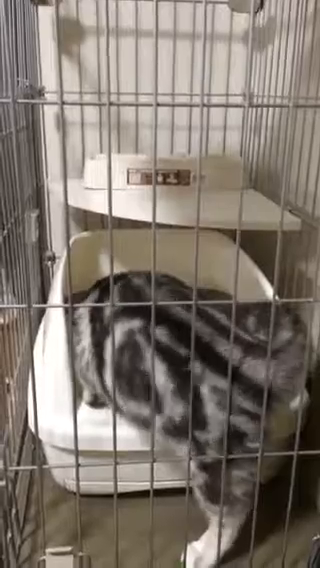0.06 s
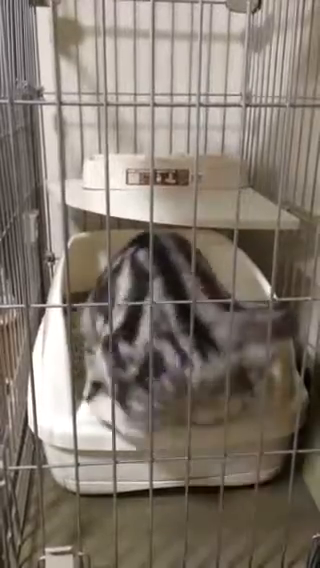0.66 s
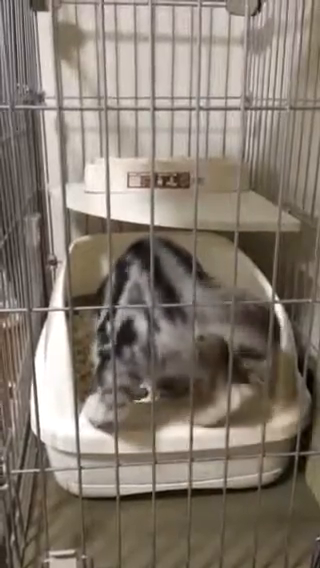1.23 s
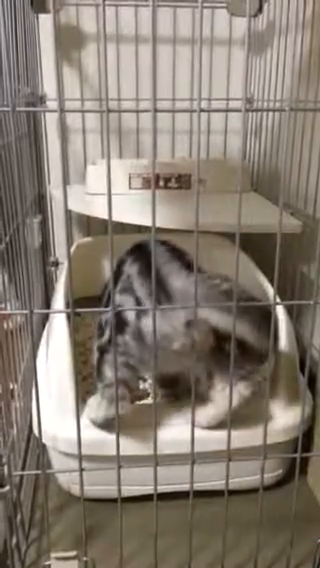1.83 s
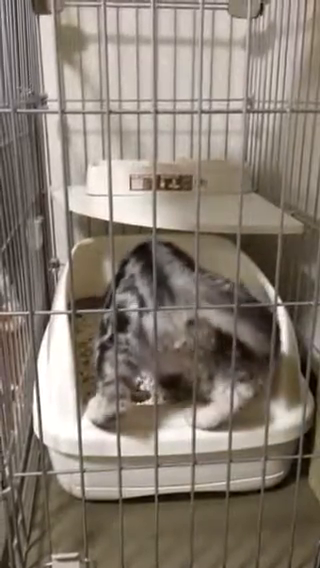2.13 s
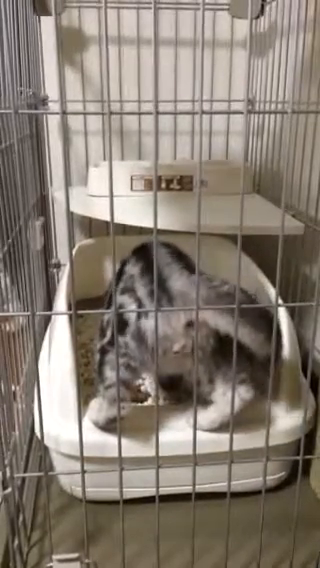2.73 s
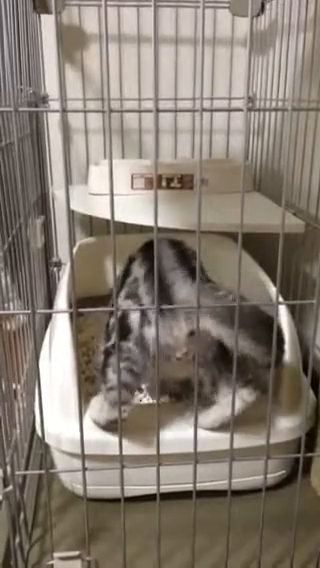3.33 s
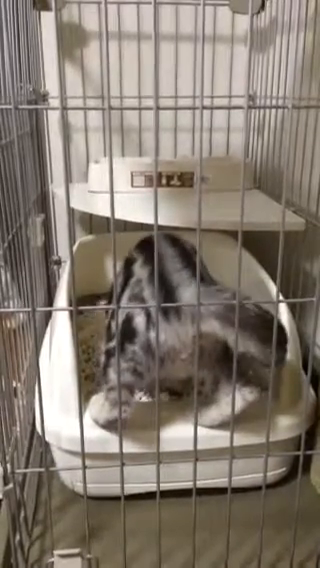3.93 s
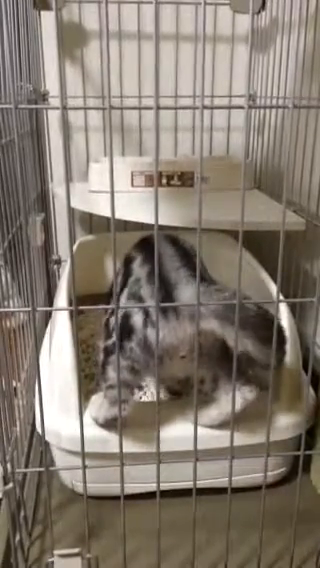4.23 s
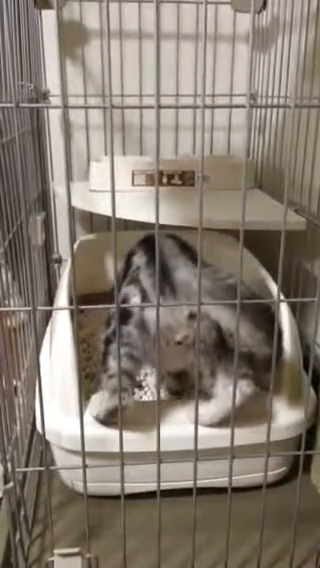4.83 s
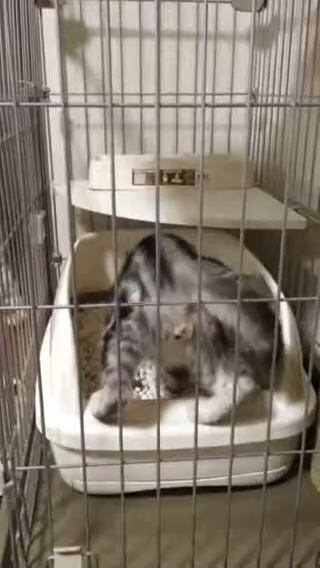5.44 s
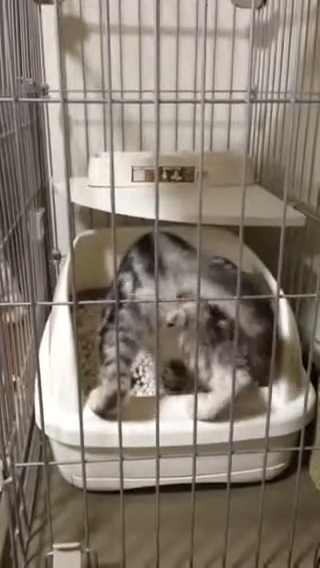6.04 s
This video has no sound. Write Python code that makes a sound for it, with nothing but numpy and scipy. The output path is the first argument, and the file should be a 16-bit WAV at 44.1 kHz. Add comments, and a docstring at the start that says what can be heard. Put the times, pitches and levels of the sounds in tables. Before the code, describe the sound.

In a small, quiet room, a kitten paws through granular litter in two bouts with a short rest between them. Scratchy rustles and gritty crunches mix with sharp little pellet clicks and a few padded knocks on the hollow plastic box. The second bout is somewhat louder. It is heard from nearby with little echo, over a faint low hum and tiny electrical ticks.

```python
"""In a small quiet room, a kitten climbs into a plastic litter box and digs in two bouts.
Its paws thump the hollow tray. Each sweep sets the litter hissing by friction, then settling; each drag
swells and dies as pellets crunch together, and single ones clack on the plastic, exciting its resonances.
Behind it are a low room rumble, mains hum, tiny electrical ticks and a faint whine that fades."""
import sys
import numpy as np
from scipy import signal
from scipy.fft import rfft, irfft, next_fast_len
from scipy.io import wavfile

SR = 44100
rng = np.random.default_rng(int(sys.argv[2]) if len(sys.argv) > 2 else 0)


def bounce(signal):
    """Save signal as a 16-bit WAV file at the path given by the first command-line argument."""
    frames = np.transpose(np.atleast_2d(signal))
    limited = np.clip(frames, -1, 1)
    pcm = np.round(limited * 32767).astype(np.int16)
    wavfile.write(sys.argv[1], SR, pcm)


N = 272538
TIME = np.arange(N) / SR

# spectrum of pellets grinding together: f/Hz, relative level/dB
CRUNCH_SPECTRUM = [(60, -32), (170, -5.5), (350, -5.5), (700, 0), (1200, 2), (2300, -1.5), (3800, -4.5),
                   (5200, -10.5), (8000, -20.5), (15000, -33)]
# spectrum of a pellet striking plastic: f/Hz, relative level/dB
CLACK_SPECTRUM = [(80, -9), (250, -20), (600, -8), (1200, 3.5), (2200, 6), (3800, 7), (5200, 2),
                  (7000, 1.5), (10000, -3), (16000, -15)]


def from_db(db):
    return 10 ** (np.asarray(db) / 20)


def rms_one(x):
    return x / np.sqrt(np.mean(x ** 2) + 1e-20)


def butter(x, hz, kind, order=2):
    return signal.sosfilt(signal.butter(order, hz, kind, fs=SR, output="sos"), x)


def colour(x, spectrum):
    """Spectral shaping: each frequency is weighted by the given curve; rms 1."""
    hz, db = np.transpose(spectrum)
    size = next_fast_len(len(x))
    bins = np.maximum(np.fft.rfftfreq(size, 1 / SR), 1)
    gain = from_db(np.interp(np.log(bins), np.log(hz), db))
    return rms_one(irfft(rfft(x, size) * gain, size)[:len(x)])


def drift(per_s):
    """Random modulation: straight lines join `per_s` chance values a second; rms 1."""
    return rms_one(np.interp(TIME * per_s, np.arange(N), rng.standard_normal(N)))


def grains(per_s, spread_db, decay_s):
    """Shot-noise envelope: random contacts of unequal size add in power, each dying quickly; rms 1."""
    sizes = from_db(spread_db * np.minimum(rng.exponential(1, N), 4))
    contacts = sizes * (rng.random(N) < per_s / SR)
    power = signal.lfilter([1], [1, -np.exp(-2 / (decay_s * SR))], contacts ** 2 + 1e-18)
    return rms_one(np.sqrt(power))


def swell(start_s, rise_s, decay_s):
    """Envelope of a push: quadratic growth to 1, then exponential decay."""
    age = TIME - start_s
    return np.clip(age / rise_s, 0, 1) ** 2 * np.exp(-np.maximum(age - rise_s, 0) / decay_s)


def tones(lines, wander_hz):
    """Line spectrum: sines under slight random amplitude and frequency modulation."""
    out = np.zeros(N)
    for hz, db in lines:
        amplitude = np.sqrt(2) * from_db(db + 2 * drift(3.03))
        cycles = np.cumsum(hz + wander_hz * drift(25)) / SR
        out += amplitude * np.sin(2 * np.pi * cycles)
    return out


def room_rumble(level_db=-67):
    """Stationary ambient noise: a low rumble with a weak hiss above it."""
    # ambient spectrum: f/Hz, relative level/dB
    spectrum = [(20, -29), (40, -7.5), (62, 2.5), (110, 2.5), (200, -5.5), (380, -9), (600, -17),
                (1200, -21), (3000, -26), (7000, -30), (16000, -35.5)]
    return from_db(level_db) * colour(rng.standard_normal(N), spectrum)


def mains_hum():
    """Alternating current hums near the mains frequency and its second harmonic."""
    # hum partials: f/Hz, level/dB
    partials = [(59.5, -80), (118.6, -76.5)]
    return tones(partials, wander_hz=1.2)


def whine():
    """Inharmonic partials under one envelope make a faint whine that swells a little, then fades."""
    # whine partials: f/Hz, level before the fade/dB
    partials = [(1373, -91.5), (1488, -90.5), (1852, -94), (1986, -108), (2225, -99), (2498, -97.5)]
    # envelope: t/s, gain/dB
    fade = [(0, 2.5), (.85, 6), (1.35, -5.5), (2.0, -26)]
    gain = from_db(np.interp(TIME, *np.transpose(fade)))
    return gain * tones(partials, wander_hz=3.5)


def electrical_ticks(first_s=.0705, period_s=.1024, impulse_db=-55, low_cut_hz=4500):
    """Electrical interference: a periodic impulse train, high-passed to tiny bright clicks."""
    impulses = np.zeros(N)
    impulses[(np.arange(first_s, N / SR, period_s) * SR).astype(int)] = from_db(impulse_db)
    return butter(impulses + 1e-18, low_cut_hz, "high")


def paw_thumps():
    """Soft impact: a padded paw drives a damped, octave-wide knock from the tray and stirs the litter."""
    # paw blows: t/s, level/dB, top of the octave f/Hz, decay/s, stir relative to the knock/dB
    blows = [(0.857, -52, 412, 0.036, -16), (0.88, -42.5, 185, .015, -13), (1.802, -41, 426, 0.012, -14),
             (2.757, -36.5, 696, 0.012, -13), (3.112, -38.5, 2410, 0.0074, -6.5),
             (5.385, -38.5, 770, 0.0094, -2), (5.589, -37.5, 560, 0.03, -32)]
    out, t = np.zeros(N + SR), TIME[:SR // 5]
    for s, db, top_hz, decay_s, stir_db in blows:
        white = rng.standard_normal(len(t))
        shape = np.exp(-t / decay_s) * (1 - np.exp(-t * top_hz))   # a duller blow builds up more slowly
        thud = butter(white, [top_hz / 2, top_hz], "band") * shape
        thud *= np.linalg.norm(shape) / np.linalg.norm(thud)
        stir = from_db(stir_db) * shape * colour(white, CRUNCH_SPECTRUM)
        start = int(s * SR)
        out[start:start + len(t)] += from_db(db) * (thud + stir)
    return out[:N]


def astir(fade_s=0.017):
    """Gating envelope with soft edges: 1 while the digging kitten keeps the litter faintly moving."""
    # bouts of digging: start t/s, end t/s
    bouts = [(1.24, 3.25), (4.66, 7.7)]
    return sum(np.clip((TIME - start_s) / fade_s, 0, 1) * np.exp(-np.maximum(TIME - end_s, 0) / fade_s)
               for start_s, end_s in bouts)


def sweep_flow(astir_db=-77.5, settle_s=0.053, release_s=0.0078):
    """Envelope of granular flow: flicks spurt; sweeps settle to a trickle and stop as the paw lifts."""
    # flicks of fine granules: t/s, level/dB
    flicks = [(0.862, -66), (1.332, -61), (1.41, -62), (1.681, -55), (2.527, -60), (2.58, -48.5),
              (3.1, -48.5), (3.196, -62.5), (4.675, -59.5)]
    # paw sweeps: start t/s, rise/s, length/s, level before settling/dB, loss on settling/dB
    sweeps = [(1.459, 0.083, 0.24, -61, 4), (1.888, 0.04, 0.293, -52.5, 9.5),
              (2.273, 0.067, 0.24, -51.5, 15), (2.715, 0.1, 0.41, -56.5, 11), (4.747, .065, 0.208, -54, 7),
              (4.967, 0.029, 0.18, -56, 17), (5.158, 0.062, 0.28, -48.5, 15),
              (5.629, 0.067, 0.36, -44.5, 13.5), (6.133, 0.05, .06, -48.5, 6)]
    power = (from_db(astir_db) * astir()) ** 2
    power += sum((from_db(db) * swell(s, rise_s=0.0012, decay_s=0.0056)) ** 2 for s, db in flicks)
    for s, rise_s, length_s, db, loss_db in sweeps:
        age = TIME - s
        settled = 1 - np.exp(-np.maximum(age - rise_s, 0) / settle_s)
        contact = np.clip(age / rise_s, 0, 1) * np.exp(-np.maximum(age - length_s, 0) / release_s)
        power += (contact * from_db(db - loss_db * settled)) ** 2
    return np.sqrt(power)


def litter_hiss(tick_db=-6.5, flutter_db=1.5, dropping_db=-75.5):
    """Friction noise: dense fine contacts merge into hiss; loose granules tick in and between sweeps."""
    # spectrum of sliding litter: f/Hz, relative level/dB
    spectrum = [(60, -29), (160, 15.5), (330, 0), (600, -9), (1500, -10.5), (3000, -1.5), (5000, 2),
                (7000, 5), (10000, 3), (13000, 0.5), (16000, -7.5)]
    hiss = colour(rng.standard_normal(N), spectrum) * grains(per_s=7100, spread_db=1.5, decay_s=0.0033)
    ticks = butter(colour(rng.standard_normal(N), spectrum), 1200, "high")
    ticks *= grains(per_s=130, spread_db=2.5, decay_s=0.0019)
    sliding = (hiss + from_db(tick_db) * ticks) * sweep_flow() * from_db(flutter_db * drift(140))
    return sliding + from_db(dropping_db) * astir() * ticks


def drag_force(astir_db=-77):
    """Incoherent addition: drags sum in power, giving envelopes for the pellets and the tray floor."""
    # paw drags: start t/s, rise/s, relative level/dB, decay/s, floor relative to pellets/dB
    drags = [(1.27, 0.063, -62.5, 0.026, -0.5), (1.395, 0.041, -60.5, 0.11, 1),
             (1.83, 0.087, -40, 0.027, -5.5), (1.99, 0.037, -56.5, 0.057, -13),
             (2.093, 0.0091, -47.5, 0.072, -28), (2.205, 0.024, -54.5, 0.13, -4),
             (2.275, 0.037, -44.5, 0.036, -4.5), (2.40, 0.046, -56, 0.036, 0),
             (2.629, 0.0051, -49.5, 0.027, -6), (2.65, 0.072, -42.5, 0.026, -2.5),
             (2.734, 0.017, -43, 0.063, -11), (3.093, 0.0075, -59, 0.069, -28),
             (4.895, 0.037, -52.5, 0.028, -11), (4.95, 0.056, -42, 0.034, -17),
             (5.10, 0.027, -53.5, 0.037, -18), (5.334, 0.05, -46.5, 0.071, -14),
             (5.55, .015, -56, 0.037, -10), (5.586, 0.0077, -41.5, 0.19, -5.5),
             (5.60, 0.054, -51, 0.28, -23), (5.845, 0.033, -75, 0.17, -19.5),
             (6.109, 0.07, -34, .03, -12.5)]
    pellet_power, floor_power = (from_db(astir_db) * astir()) ** 2, np.zeros(N)
    for s, rise_s, db, decay_s, floor_db in drags:
        push = from_db(db) * swell(s, rise_s, decay_s)
        pellet_power += push ** 2
        floor_power += (from_db(floor_db) * push) ** 2
    return np.sqrt(pellet_power), np.sqrt(floor_power)


def pellet_crunch(gain_db=-3.0, lumpy_db=2.1, stray_db=-11.5, rumble_db=-3.0, floor_hz=(219, 860)):
    """Granular friction: dragged pellets grind in small avalanches; strays tap, the floor rumbles."""
    on_pellets, on_floor = drag_force()
    grind = colour(rng.standard_normal(N), CRUNCH_SPECTRUM)
    grind *= grains(per_s=1700, spread_db=4.5, decay_s=0.0032)
    strays = colour(rng.standard_normal(N), CLACK_SPECTRUM)
    strays *= grains(per_s=62, spread_db=1.5, decay_s=0.011)
    rumble = rms_one(butter(rng.standard_normal(N), floor_hz, "band"))
    dragged = (grind + from_db(stray_db) * strays) * on_pellets + from_db(rumble_db) * rumble * on_floor
    return dragged * from_db(gain_db + lumpy_db * drift(110))


def clacks(ring_db=6.5, relative_width=0.083, attack_s=.0005, hold_s=0.0052):
    """Hard impact: each contact rattles briefly at its own pitch; damping takes the treble first."""
    # pellets and claws on the tray: t/s, relative level/dB, low share/dB, high share/dB, pitch f/Hz
    strikes = [(1.801, -35.5, -3, -8.5, 1770), (1.814, -42.5, -13, -0.5, 2230),
               (1.909, -39.5, -18, -7, 1070), (1.953, -39, -9, -5, 865), (2.093, -40.5, -1, -5.5, 1090),
               (2.131, -41.5, -21, 3, 3070), (2.157, -46.5, -2, -3, 1330), (2.214, -44, -5.5, -3.5, 3560),
               (2.293, -43.5, -18, -4.5, 2300), (2.326, -36, -9, -1, 2170), (2.627, -37, -8.5, -9.5, 1720),
               (2.755, -35, -9, -15, 1100), (2.886, -38.5, -35, -8, 3940), (3.012, -46.5, -15, -6.5, 2030),
               (3.113, -39, -12, -4, 1500), (4.987, -36, -14, -14, 1820), (4.995, -33, -33, -13, 1180),
               (5.007, -35, -24, -2.5, 1310), (5.039, -44, -1, -21, 1150), (5.109, -45.5, -8, -10, 1770),
               (5.366, -29, -6, -3, 6400), (5.384, -37, 1, -5, 1080), (5.439, -46.5, 0, -8, 1150),
               (5.488, -42, -5.5, -15, 1120), (5.568, -54.5, 4.5, -6, 1290), (5.588, -35.5, -3, -7.5, 2700),
               (5.678, -37, -4.5, -3, 1600), (5.731, -36.5, -14, -17, 3940), (5.849, -38, -16, -2, 1900),
               (5.902, -46, -14, -9, 1890), (5.973, -40.5, -8, -10, 1230), (5.998, -39.5, -9.5, -9, 1370),
               (6.049, -37.5, -32, -6, 6500), (6.151, -36.5, -23, -2, 1810), (6.158, -32, -7, -1, 2660)]
    out, t = np.zeros(N + SR), TIME[:SR // 16]
    for s, level_db, low_db, high_db, pitch_hz in strikes:
        white = rng.standard_normal(len(t))
        ring_band_hz = pitch_hz * np.exp([-relative_width / 2, relative_width / 2])
        ring = butter(white, ring_band_hz, "band", order=1)
        rattle = colour(white + from_db(ring_db) * ring, CLACK_SPECTRUM)
        # band, gain/dB, decay/s
        bands = [(butter(rattle, 760, "low", order=4), low_db - 2.5, 0.0042),
                 (butter(rattle, [900, 5000], "band", order=3), -2.5, 0.0032),
                 (butter(rattle, 3760, "high", order=4), high_db, 0.0029)]
        start = int(s * SR)
        for band, db, decay_s in bands:
            shape = np.exp(-(np.hypot(t, hold_s) - hold_s) / decay_s) * (1 - np.exp(-t / attack_s))
            burst = band * shape
            burst *= np.linalg.norm(shape) / np.linalg.norm(burst)
            out[start:start + len(t)] += from_db(level_db + db) * burst
    return out[:N]


def tray(x):
    """Resonance: each mode of the hollow plastic box lifts a narrow band of the sound driving it."""
    # tray modes: f/Hz, bandwidth/Hz, lift/dB
    modes = [(308.6, 26, 9.5), (412, 14, 6.5), (463, 44, 10.5), (641, 19.6, 9), (697, 13.3, 8.5),
             (760, 19, 2.5), (938, 120, 4.5), (1107, 64, 3.5), (1345, 61, 1.5), (1640, 26, 7),
             (2030, 250, 4.5), (2420, 77, 4.5), (3100, 37, 3), (3430, 110, 2), (6130, 180, 1.5)]
    out = x
    for hz, width_hz, lift_db in modes:
        radius = np.exp(-np.pi * width_hz / SR)
        feedforward = np.array([1, 0, -1]) * (1 - radius ** 2) / 2
        feedback = [1, -2 * radius * np.cos(2 * np.pi * hz / SR), radius ** 2]
        out = out + (from_db(lift_db) - 1) * signal.lfilter(feedforward, feedback, x + 1e-18)
    return out


def scatter(x, decay_s):
    """Diffuse reflection: an uneven wall smears the sound over a few milliseconds."""
    t = TIME[:SR // 32]
    wall = rng.standard_normal(len(t)) * np.exp(-t / decay_s)
    return signal.fftconvolve(x, wall / np.linalg.norm(wall))[:N]


def room(x, echo_s=.0135, echo_db=-24.0, tail_db=-16.0, t60_s=0.24, dull_hz=3500):
    """Reverberation: one early wall reflection and a short dull tail join the direct sound."""
    t = TIME[:SR // 2]
    tail = butter(rng.standard_normal(len(t)), dull_hz, "low", order=1)
    tail *= from_db(-60 * t / t60_s) * (1 - np.exp(-t / 0.0036))
    reverberation = signal.fftconvolve(x, tail / np.linalg.norm(tail))[:N]
    echo = np.interp(TIME - echo_s, TIME, scatter(x, decay_s=0.0013), left=0)
    return x + from_db(echo_db) * echo + from_db(tail_db) * reverberation


def scene():
    """Superposition: litter in the tray and paw thumps sound in the room, over a faint background."""
    litter = tray(pellet_crunch() + litter_hiss() + clacks())
    radiated = butter(litter, 115, "high")   # the small tray radiates almost no deep bass
    digging = room(radiated + paw_thumps())
    return (digging + room_rumble() + mains_hum() + whine() + electrical_ticks())[None]


def record(dry, cutoff_hz=15500):
    """Band limiting: a steep low-pass removes the highest treble."""
    return signal.sosfilt(signal.ellip(10, .2, 70, cutoff_hz, fs=SR, output="sos"), dry)


dry = scene()
out = record(dry)
bounce(out)
```